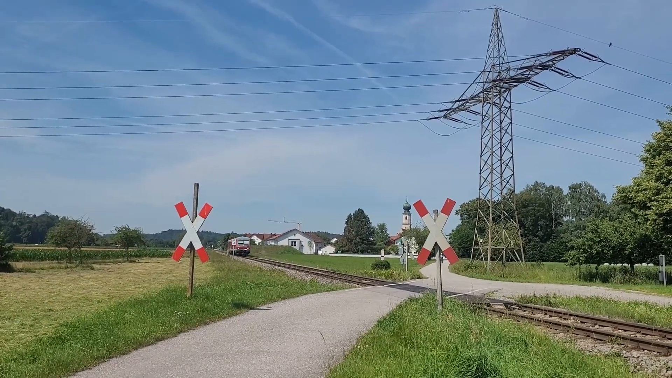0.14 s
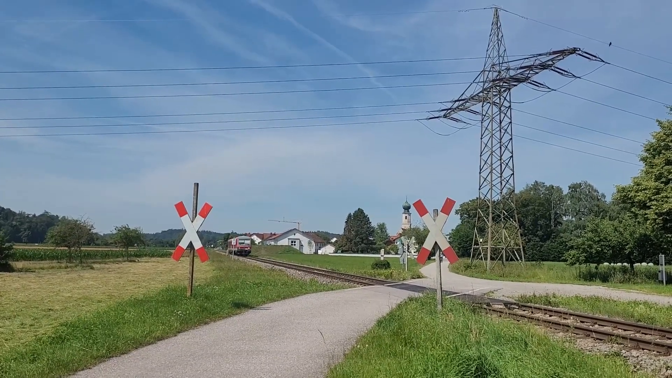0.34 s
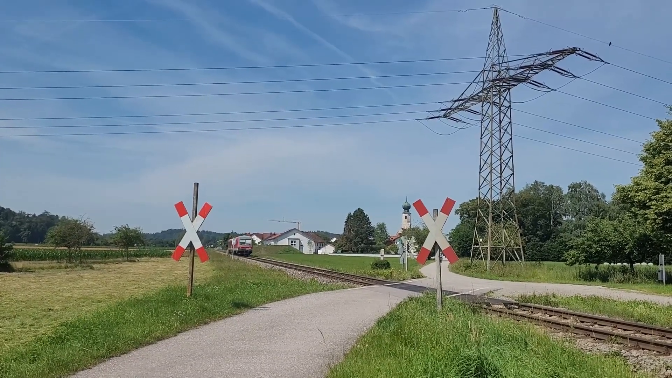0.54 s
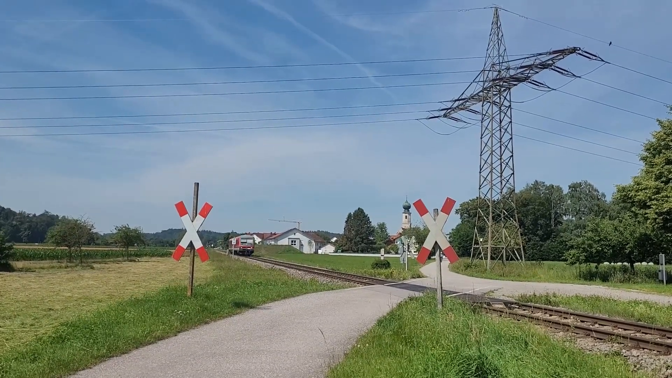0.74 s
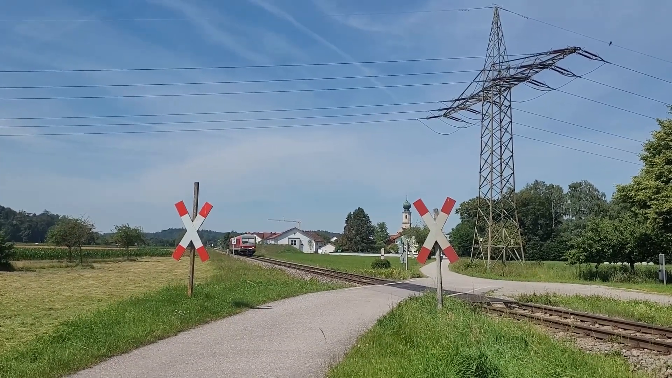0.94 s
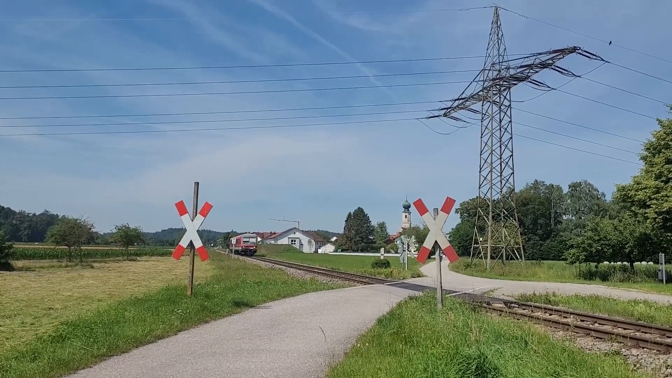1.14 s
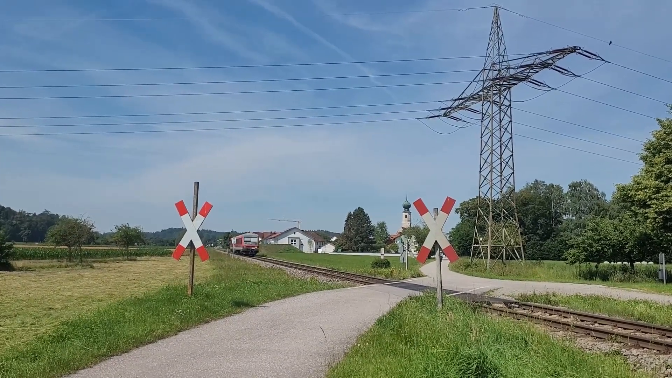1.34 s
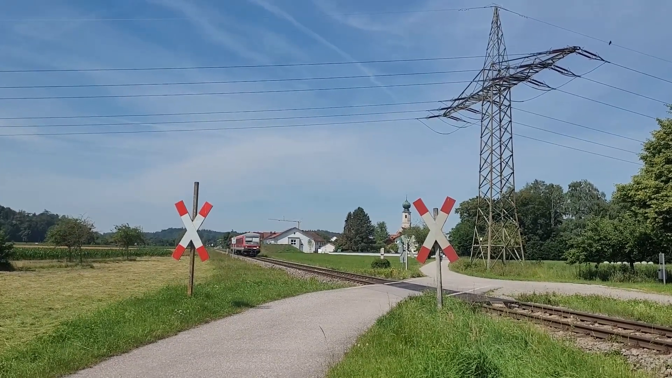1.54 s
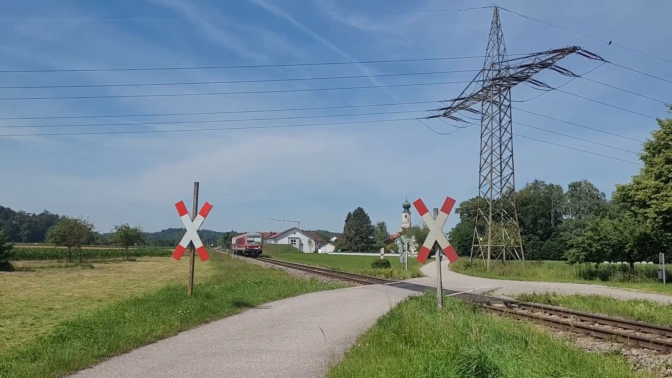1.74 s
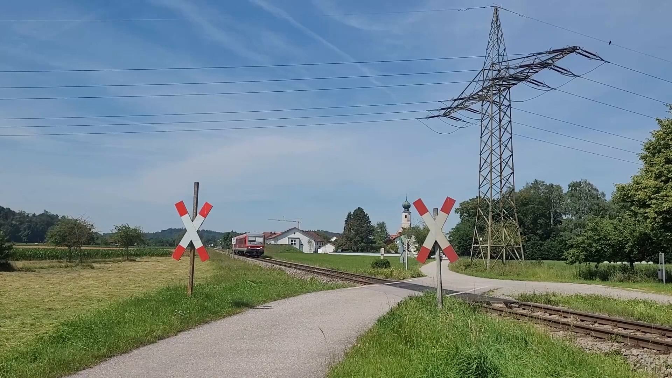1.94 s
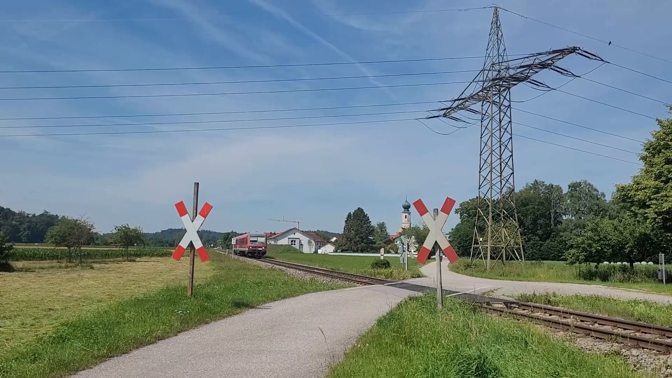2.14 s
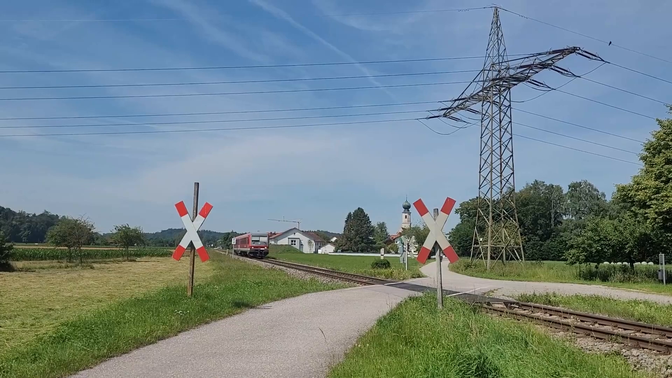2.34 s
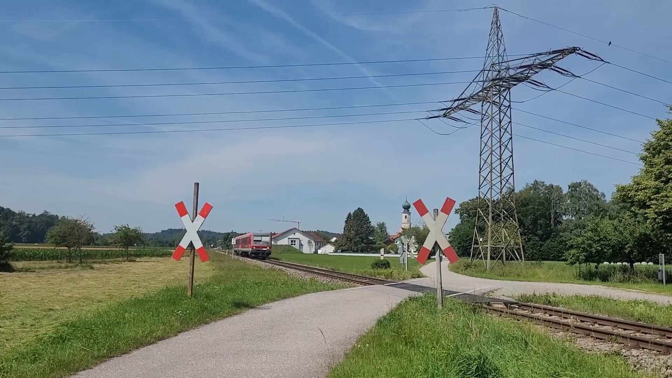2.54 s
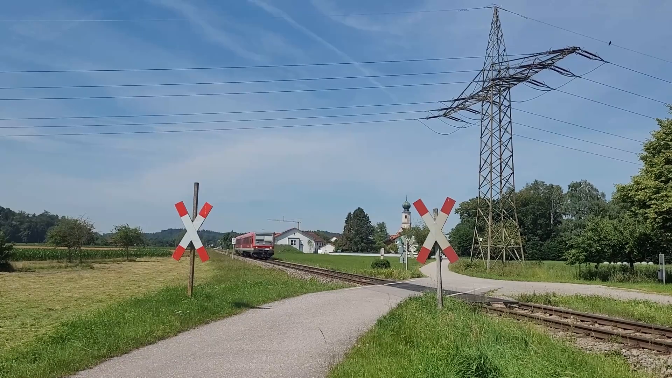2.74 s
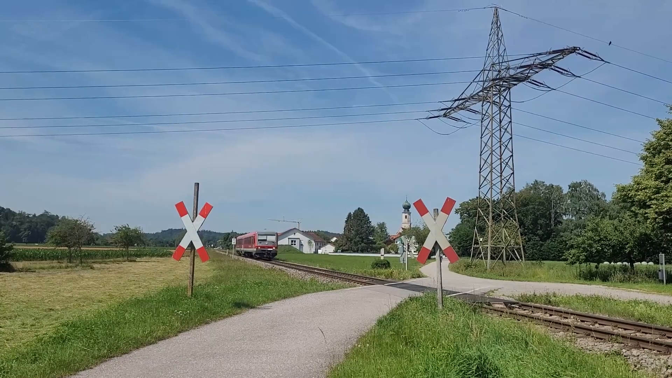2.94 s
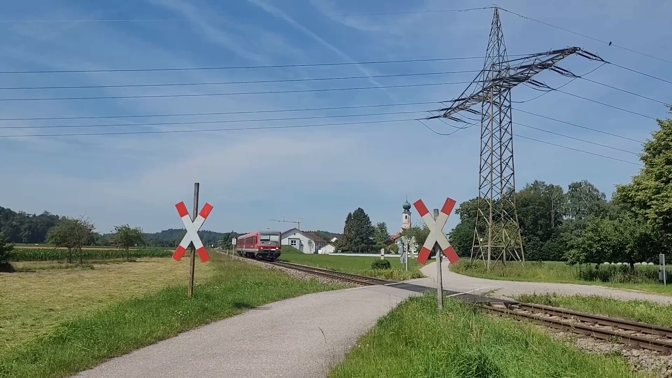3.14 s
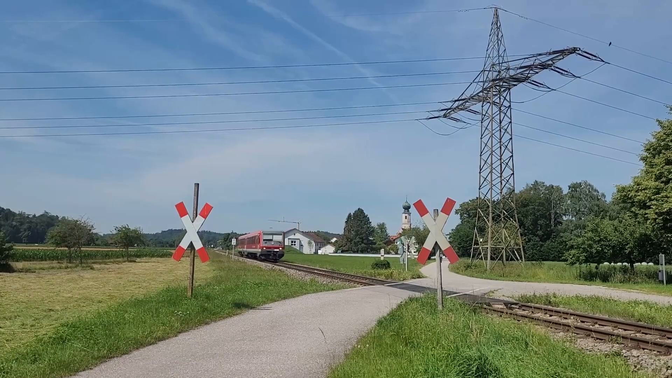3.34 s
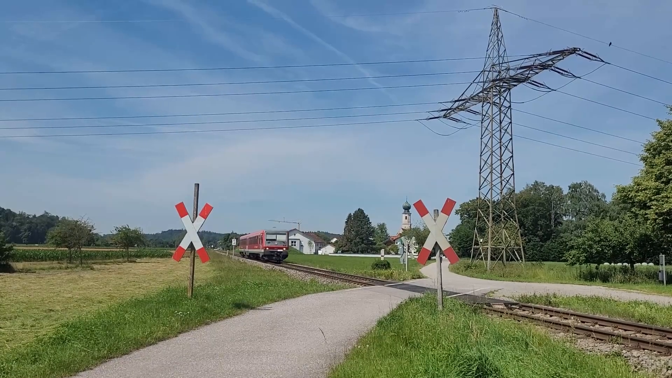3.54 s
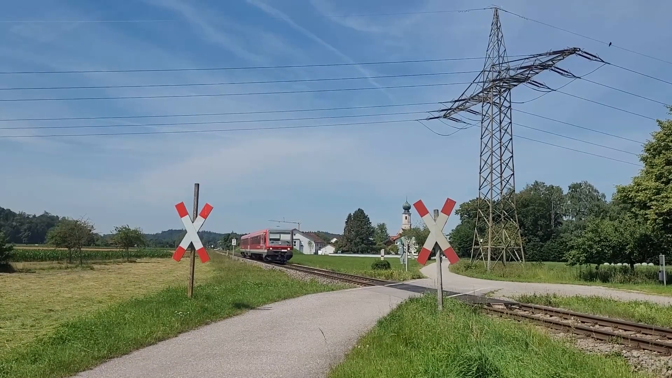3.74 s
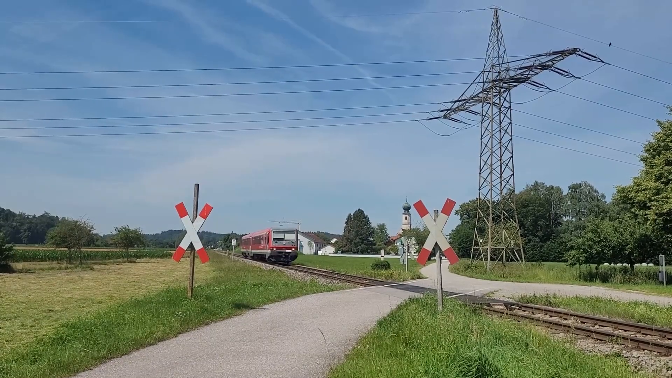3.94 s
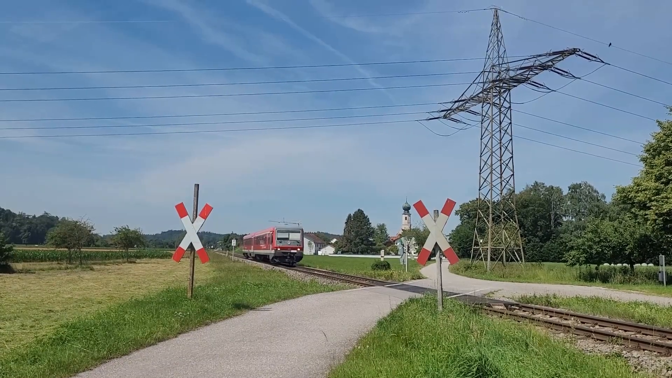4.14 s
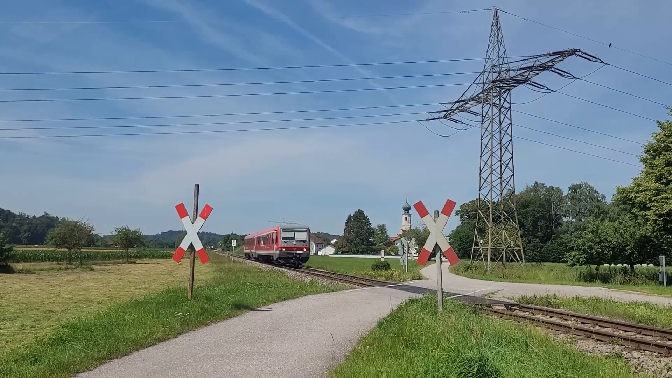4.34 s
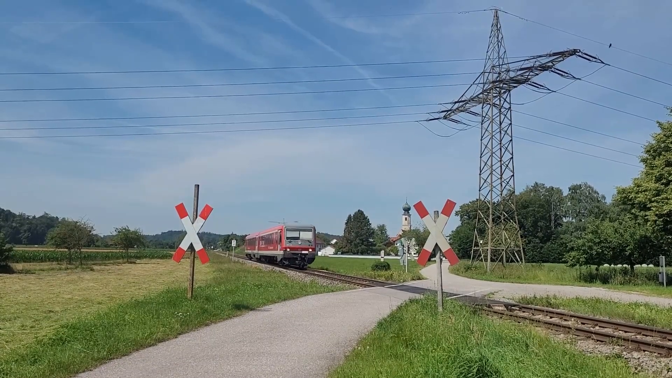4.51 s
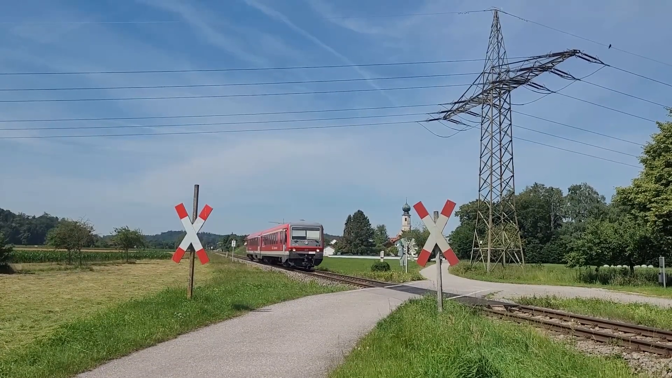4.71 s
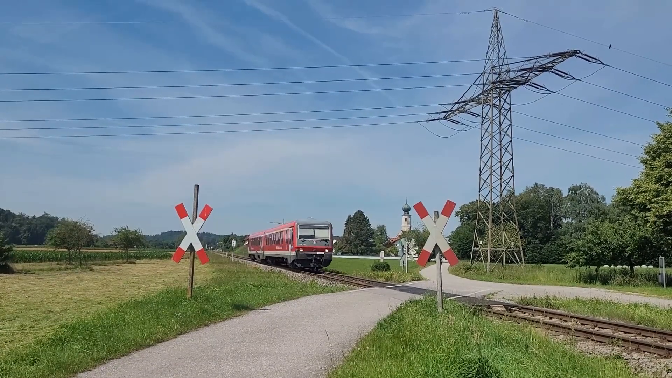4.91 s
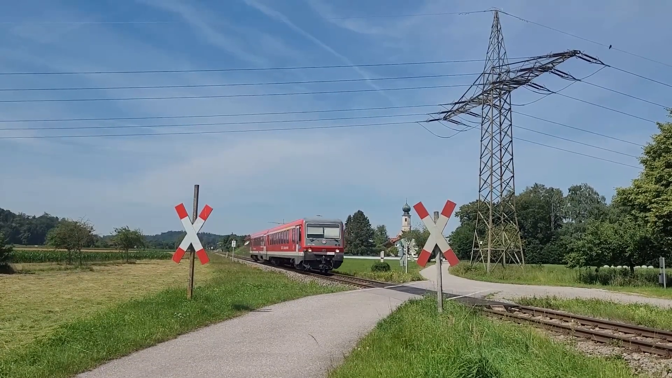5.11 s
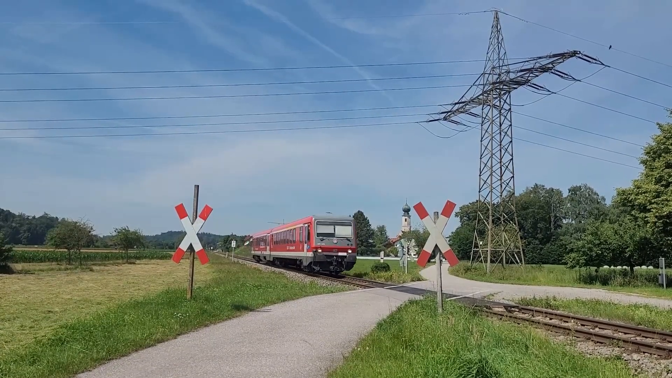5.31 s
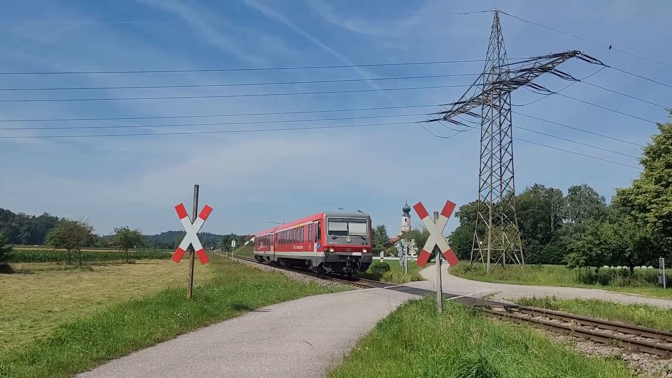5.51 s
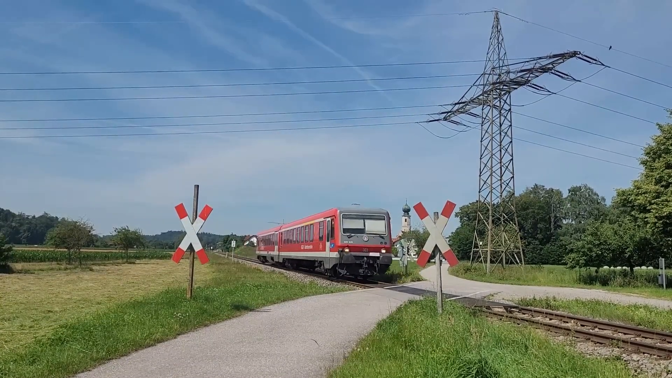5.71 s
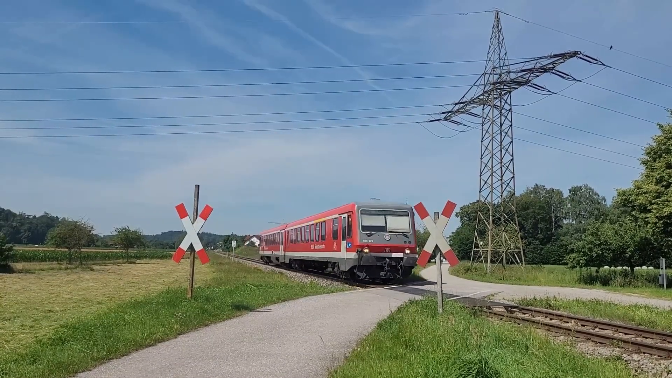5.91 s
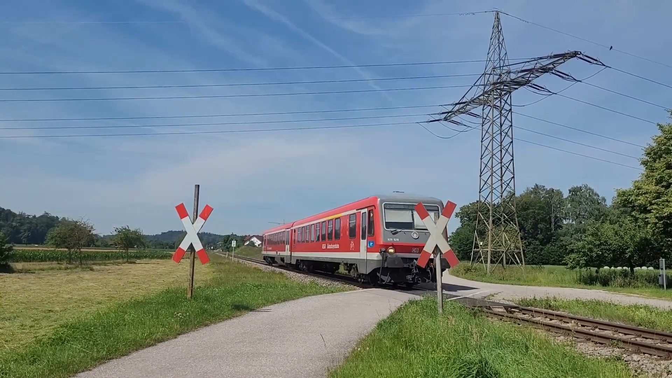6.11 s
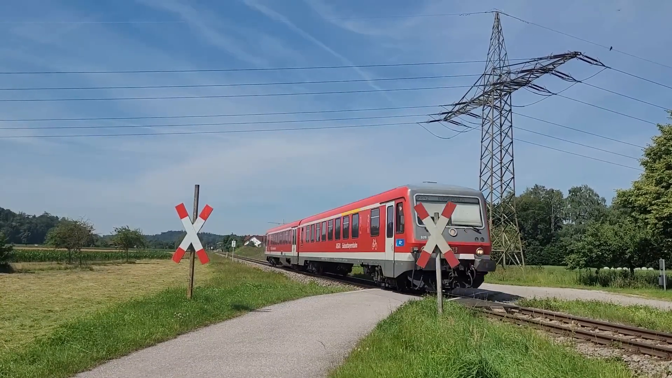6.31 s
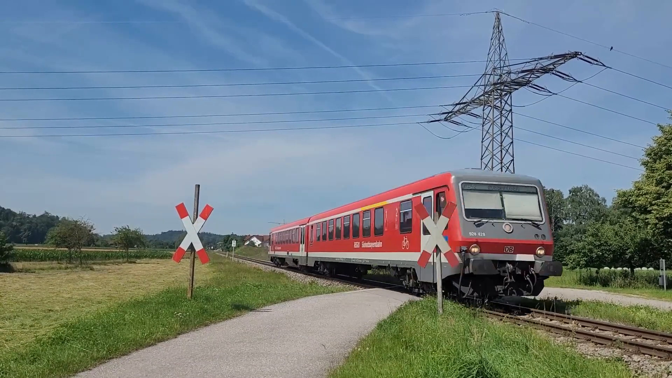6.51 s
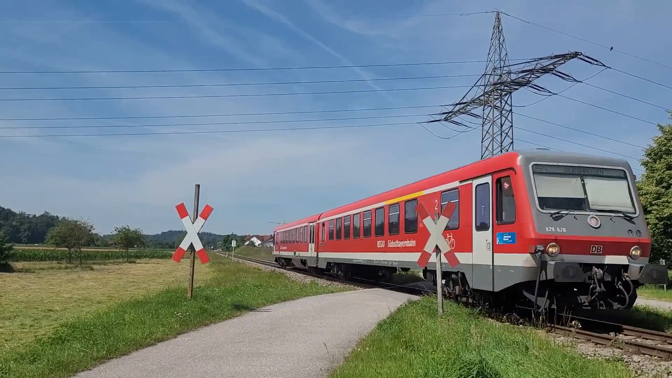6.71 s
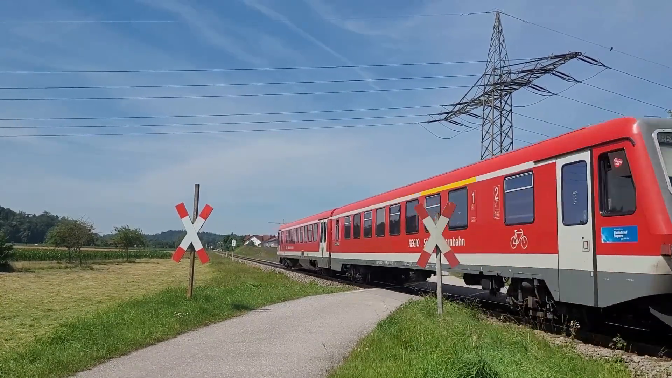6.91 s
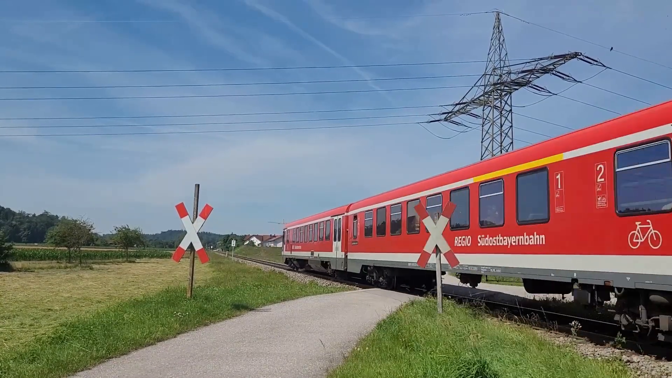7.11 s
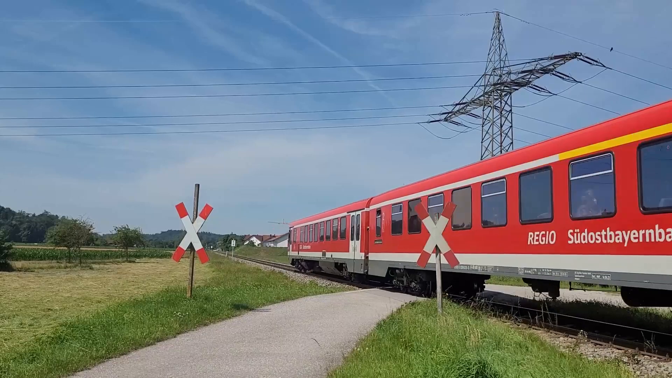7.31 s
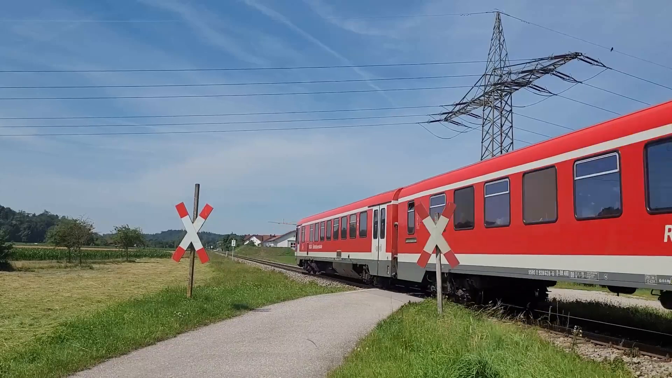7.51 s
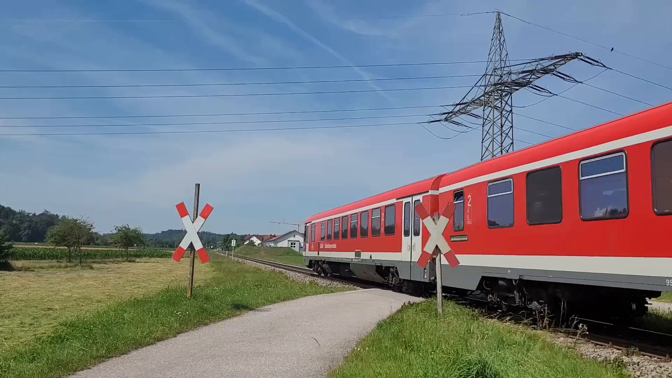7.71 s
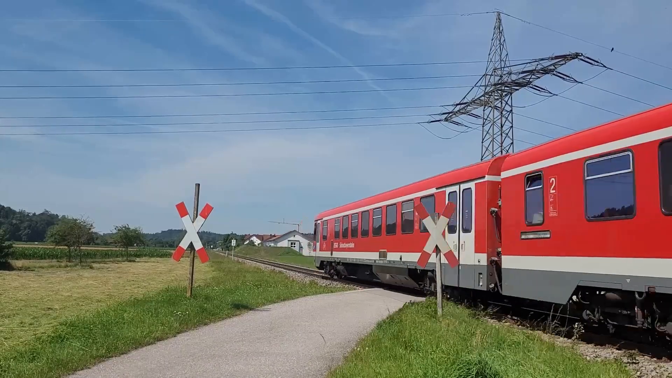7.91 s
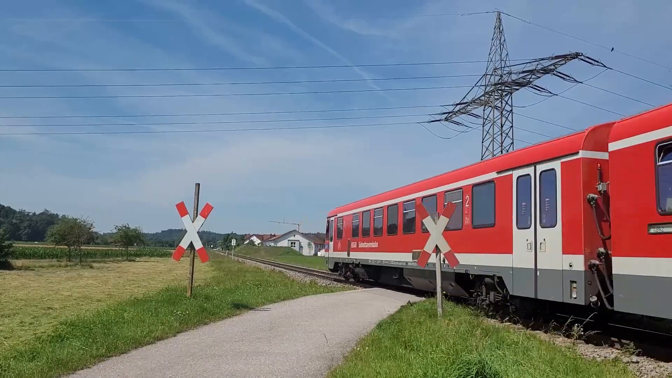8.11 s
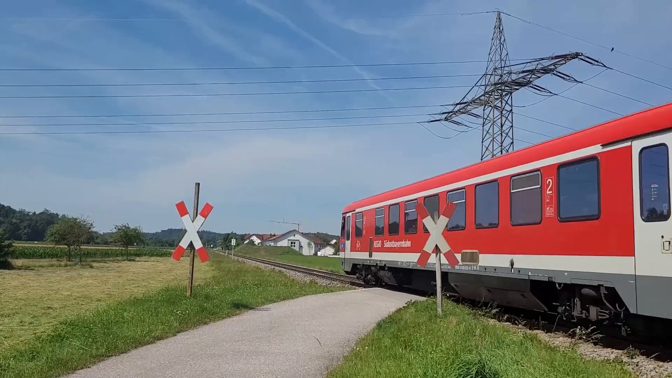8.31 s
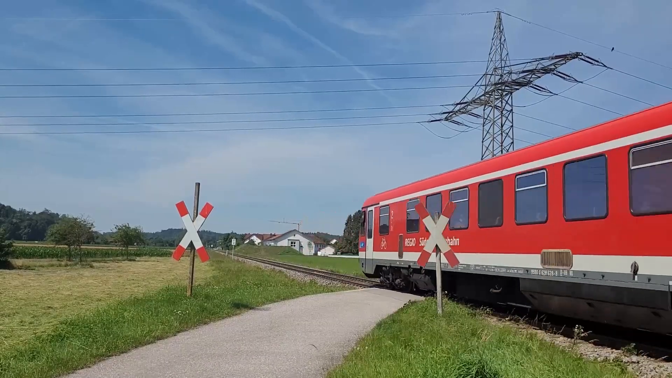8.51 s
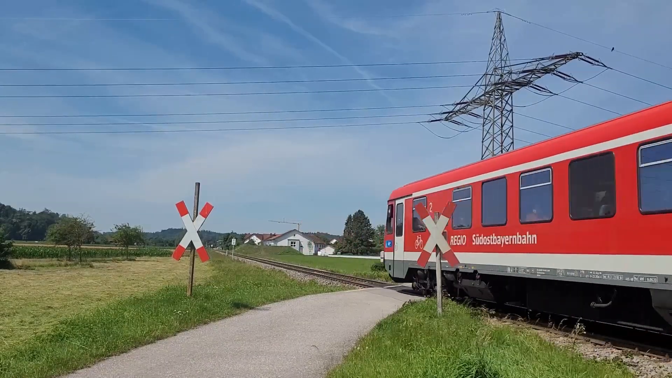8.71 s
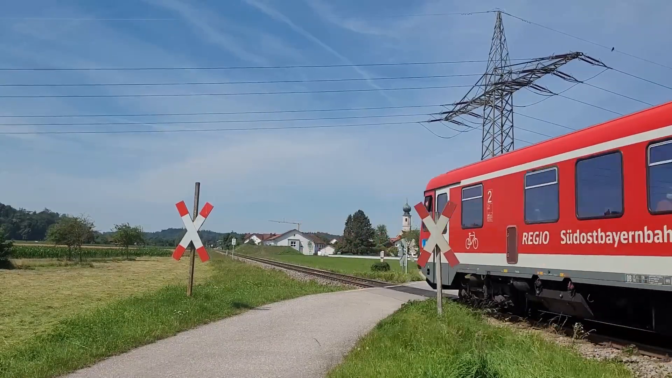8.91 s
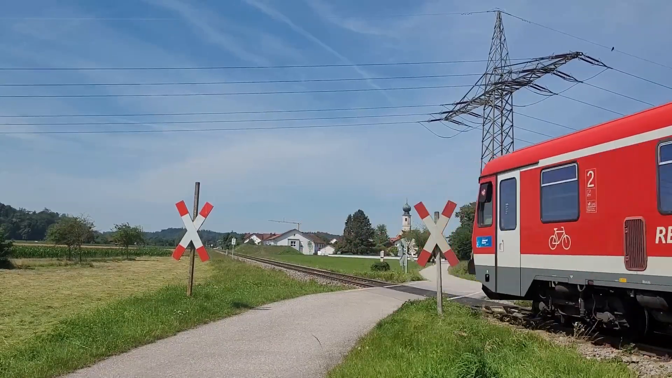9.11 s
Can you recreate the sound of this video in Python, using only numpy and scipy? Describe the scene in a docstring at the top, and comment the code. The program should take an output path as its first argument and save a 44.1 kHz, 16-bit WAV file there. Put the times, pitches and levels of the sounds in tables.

```python
"""A two-car diesel railcar comes across open fields and passes a few metres away at a level crossing.
Its engine rumbles, whines and drones; rough steel on steel makes the track roar and the rails and
wheels ring. The wheels thud over the crossing and three pairs of axles clash over a rail joint.
While it is still far off, birds call, something ticks drily by the track and a puff of air thumps
softly on the left, all over a bed of country hush."""
import sys
import numpy as np
from scipy import signal
from scipy.fft import rfft, irfft, next_fast_len
from scipy.io import wavfile
from scipy.ndimage import uniform_filter1d, map_coordinates

SR = 44100
rng = np.random.default_rng(int(sys.argv[2]) if len(sys.argv) > 2 else 0)


def wav_out(sig):
    """Save sig, one row per channel (or a flat mono array), as 16-bit PCM at SR to the path in sys.argv[1]."""
    wavfile.write(sys.argv[1], SR, np.round(np.clip(np.atleast_2d(sig).T, -1, 1) * 32767).astype(np.int16))


N = 403515
SPEED_M_PER_S, GAP_M, SOURCE_SIZE_M = 17, 5, 8.08  # train speed, passing distance, steel shaken per bogie

# each bogie draws level with the listener: t/s, rolling weight/dB, ring level/dB
BOGIES = [(7.15, 0, -46), (7.72, -1.5, -37.5), (8.42, -1.3, -37.5), (9.2, 5, -40)]
# noise colours of the train's layers, from far off to alongside: f/Hz, relative level/dB
ENGINE_FAR = [(18, -40), (30, -18), (45, -2.5), (68, 5.5), (100, -2.5), (125, -4.5), (152, -5.5),
              (190, -20), (260, -79)]
ENGINE_NEAR = [(30, -40), (41, -0.5), (64, -1), (88, 2), (130, 0.5), (175, -5), (200, -28), (260, -44)]
BODY_COLOUR = [(97, -14), (160, -5.5), (199, -5.5), (238, -1), (293, -3.5), (334, -9.5), (381, -6.5),
               (430, -14.5), (860, -75)]
TRACK_FAR = [(230, -26), (390, -13), (421, -14.5), (507, -2), (588, 2.5), (772, -1.5), (825, 2.5),
             (880, -9), (925, -7), (1070, 1.5), (1330, -20.5), (2150, -68)]
TRACK_HEAD_ON = [(230, -42), (390, -11), (423, -17.5), (567, -3.5), (834, -17), (905, -19), (1400, -23),
                 (2500, -75)]
TRACK_BY_CAB = [(300, -30), (420, -28), (580, 4), (720, 3.5), (850, -2), (1050, -4), (1300, -22),
                (1700, -59)]
TRACK_NEAR = [(230, -34), (390, -12), (437, -6.5), (610, -1), (910, -8.5), (1080, -13), (1400, -24.5),
              (2500, -65)]
WHEELS_FAR = [(720, -38), (1230, -22.5), (1510, -5.5), (1850, -16.5), (2010, -10.5), (2200, -3.5),
              (2320, -25), (2430, -12.5), (3070, -14.5), (3380, -22.5), (3710, -16), (4330, -20),
              (4810, -14.5), (6600, -29.5), (8580, -74)]
WHEELS_NEAR = [(720, -12.5), (1230, -5.5), (1770, -4.5), (2240, 1.5), (2520, -8), (2840, -6), (3270, -13.5),
               (4090, -16.5), (4610, -12), (6600, -27.5), (8580, -56)]
HISS_FAR = [(4500, -29), (6200, -13), (7200, -6.5), (8400, -1.5), (10000, -10), (11800, -6), (13000, 4),
            (15500, -4.5)]
HISS_NEAR = [(4500, -18), (6200, -10), (6700, -10.5), (8100, -3.5), (9400, -11), (15500, -11)]
# how each layer builds: level beside one bogie/dB, gain per halving of distance/dB, field loss/(dB/m)
RUMBLE_GROWTH = (-29, 4.9, 0.066)
BODY_GROWTH = (-34, 13, 0.0022)
TRACK_GROWTH = (-30, 7.92, 0.13)
WHEELS_GROWTH = (-38, 10.3, 0.11)
HISS_GROWTH = (-55.5, 6.2, 0.098)
# swells and dips riding on that build: centre t/s, length/s, gain/dB
RUMBLE_SWELLS = [(0, 0.78, -9), (1.186, 0.11, -8), (2.8, .6, -0.5), (3.746, 0.094, -9), (4.42, 0.28, -5),
                 (6.16, 0.18, 6.5), (6.752, 0.78, 0), (7.45, 0.36, -5)]
BODY_SWELLS = [(.52, 0.23, 8), (2.4, 1.7, 9), (6.4, 0.62, 3), (7.4, 0.51, -2.5), (8.65, 1.2, 2.5)]
TRACK_SWELLS = [(6.09, 0.28, -4)]
HISS_SWELLS = [(4, 8.4, 4.3), (6, 0.64, 3.4), (7.6, 0.21, 4.6), (9, 0.96, 8.7)]
# tones of the engine and drive: f/Hz, level before the fader/dB
WHINE_TONES = [(279, -77), (705, -65.5), (826, -66), (1044, -72)]
DRONE_TONES = [(62, -32.5), (123.8, -35.5), (376.8, -51), (613.7, -31.5)]
# their faders, whine from ahead and drone from alongside: t/s, whine gain/dB, drone gain/dB
TONE_FADERS = [(0, -31, -69), (2.6, 1.5, -30), (5.4, 7.5, -47), (6.4, 14.5, -6), (8.55, -18, -4.5),
               (8.67, -24, 3.5)]
# the loudest engine tone surges as the cars go by: t/s, level/dB
HUM_LEVEL = [(0, -82), (5.7, -55), (6.5, -38), (7.62, -37), (7.73, -24), (7.87, -40), (8.26, -25.5),
             (8.42, -36), (8.55, -18.5), (8.68, -20), (8.78, -32), (8.88, -19), (9.02, -31)]
# its pitch sinks: t/s, f/Hz
HUM_PITCH = [(6.9, 297), (7.8, 281.7)]
# resonances of the steel: f/Hz, width/Hz, relative level/dB
RAIL_MODES = [(1539, 180, 1.5), (2161, 220, 10), (3040, 90, -6), (4650, 130, -12), (4920, 160, -14.5)]
WHEEL_MODES = [(2263, 110, -1), (2843, 110, 4), (3710, 70, -5.5), (4630, 83, -7.5)]
# the rails sing ahead of the cab: t/s, level/dB
RAIL_LEVEL = [(3, -75), (5.4, -57), (6.12, -44), (6.3, -36.5), (6.56, -33), (6.85, -43.5), (7.3, -71)]
# wheels hit the crossing and jolt the car body: t/s, ring f/Hz, strength/dB
THUDS = [(5.694, 594, -24.5), (6.19, 543, -22), (6.485, 555, -17.5), (6.558, 578, -19), (6.617, 655, -14.5),
         (6.663, 668, -18.5), (6.727, 737, -16.5), (6.775, 900, -18), (6.815, 563, -20.5),
         (6.935, 142, -14.5), (7.039, 252, -16), (7.68, 558, -15.5), (7.924, 238, -11), (8.041, 258, -12),
         (9.094, 601, -8.5)]
# axles hit the rail joint: t/s, strength/dB
AXLE_HITS = [(7.097, -23.5), (7.21, -25), (7.952, -27), (8.06, -26.5), (8.385, -29.5), (8.495, -33.5)]
# dry ticks by the track: t/s, snap strength/dB, ring f/Hz
TICKS = [(2.034, -43, 2950), (2.073, -46.5, 2330), (2.1235, -47, 3070), (2.605, -43, 2740),
         (2.6429, -44, 2320), (2.6938, -48, 3060), (3.593, -44, 2610), (3.6306, -41.5, 2340),
         (3.681, -47, 3060), (3.7234, -47, 2540), (3.7865, -41.5, 2430), (3.8417, -45, 2690),
         (3.8564, -52, 2500), (3.911, -40, 2400), (3.9794, -48, 2400), (4.036, -38.5, 2400),
         (4.0921, -43, 2450), (4.159, -44, 2480), (4.2926, -43, 2300), (4.4914, -44, 2980),
         (4.69, -40, 2500), (4.7641, -40, 2520), (5.09, -41, 2380)]
# bird notes: t/s, length/s, start f/Hz, end f/Hz, level/dB
WHISTLES = [(0, 0.081, 2080, 1980, -56.5), (.17, 0.21, 1700, 1475, -68), (0.444, 0.19, 1970, 1935, -60),
            (.65, 0.083, 2250, 2170, -61.5), (0.727, 0.13, 2460, 2420, -63), (1.066, 0.1, 2100, 2010, -62),
            (1.318, 0.045, 2100, 1920, -58.5), (1.48, 0.05, 2300, 2150, -60), (1.62, .06, 2050, 2130, -61)]
TWITTERS = [(1.11, .05, 4400, 4950, -69), (1.645, .08, 5400, 4000, -68), (2.16, .06, 4800, 4100, -66),
            (2.735, .07, 4700, 4300, -68), (3.125, 0.07, 4800, 4350, -66.5), (4.26, .06, 3900, 3300, -63)]
# noise colours of the hits and the background bed: f/Hz, relative level/dB
THUD_COLOUR = [(70, -24), (290, 9), (620, 3), (1200, -4), (2200, -1.5), (9000, -72)]
CLASH_COLOUR = [(1350, -17), (2300, -3), (3680, -5.5), (5050, -5), (6820, -9.5), (8290, -6), (15100, -13.5),
                (16000, -4)]
TICK_COLOUR = [(1700, -27), (2450, 6.5), (3100, 3), (3600, -5), (5200, -2.5), (7000, -6.5), (8300, -1),
               (10000, -6.5), (11500, -2), (14000, -3)]
HUSH_COLOUR = [(30, -6), (150, -6), (460, 0.5), (750, -11), (1300, -14.5), (2000, -6.5), (3200, -17),
               (3800, -15), (6000, -30), (9000, -50)]
HIGH_HISS_COLOUR = [(11000, -28), (12200, -16), (13200, -7), (15500, -2)]
# stereo width of a source ahead and alongside: f/Hz, side minus mid/dB
WIDTH_AHEAD = [(60, -11), (200, -14), (700, -13), (1290, -4), (2200, -1.5), (4400, .5)]
WIDTH_BESIDE = [(60, -13.5), (200, -22.5), (380, -8), (700, -0.5), (1290, 5.5), (2380, -6.5), (4400, 0.7)]


def engine():
    """A throbbing rumble, a thin whine on the approach, a drone as the underfloor engine draws level."""
    rumble_db = approach(RUMBLE_GROWTH, RUMBLE_SWELLS)
    throb = unit(amp(3.6 * wobble(16)))
    rumble = amp(rumble_db) * throb * passing((4.8, ENGINE_FAR, 0), (7.2, ENGINE_NEAR, 1))
    whine_db, drone_db = curves(TONE_FADERS)
    whine = amp(whine_db) * shaft_tones(WHINE_TONES, drift=0.00231, flutter_db=-0.5, lag_ms=0.066)
    drone = amp(drone_db) * shaft_tones(DRONE_TONES, drift=0.00496, flutter_db=3.5, lag_ms=-0.005)
    return rumble + whine + drone + hum()


def shaft_tones(partials, drift, flutter_db, lag_ms):
    """Machine tones that share the shaft's drift in speed; each flutters on its own."""
    shaft_time = np.cumsum(1 + drift * wobble(5)) / SR
    stereo_time = shaft_time + np.array([[.5], [-.5]]) * lag_ms / 1000
    mix = np.zeros((2, N))
    for hz, db in partials:
        flutter = unit(amp(flutter_db * wobble(14)))
        mix += np.sqrt(2) * amp(db) * flutter * np.sin(2 * np.pi * hz * stereo_time + 1.04 * wobble(22))
    return mix


def hum(waver=0.017, throb_db=2.8):
    """One strong engine tone that wavers, throbs and sinks in pitch."""
    (db,), (hz,) = curves(HUM_LEVEL), curves(HUM_PITCH)
    tone = np.sin(2 * np.pi * np.cumsum(hz * (1 + waver * wobble(30))) / SR)
    return from_right(amp(db) * unit(amp(throb_db * wobble(45)) * tone), lag_ms=0.12)


def rolling(sleeper_hz=19):
    """Rough steel on steel shakes the car body, the track and the wheels; all thrum over the sleepers."""
    thrum = np.sin(2 * np.pi * sleeper_hz * clock() + 2.6 * wobble(4.7)) + wobble(16)
    body_db = approach(BODY_GROWTH, BODY_SWELLS) + 1.4 * thrum + wobble(19)
    body = amp(body_db) * rush(BODY_COLOUR, beside=0.61)
    track_db = approach(TRACK_GROWTH, TRACK_SWELLS) + 0.62 * thrum + wobble(70)
    track = amp(track_db) * passing((6.0, TRACK_FAR, 0), (6.45, TRACK_HEAD_ON, .6),
                                    (6.88, TRACK_BY_CAB, 1), (7.6, TRACK_NEAR, 1))
    wheels_db = approach(WHEELS_GROWTH) + 1.02 * thrum + 1.1 * wobble(90)
    wheels = amp(wheels_db) * passing((6.5, WHEELS_FAR, 0), (7.1, WHEELS_NEAR, 1))
    hiss_db = approach(HISS_GROWTH, HISS_SWELLS) + 0.37 * thrum + 1.2 * wobble(150)
    hiss = amp(hiss_db) * passing((5.6, HISS_FAR, 0), (7.2, HISS_NEAR, 1))
    return body + shimmer(track + hiss, depth_db=2.0) + shimmer(wheels, depth_db=2.4)


def approach(growth, swells=()):
    """A layer's level in dB: it builds as the bogies near, less what the fields absorb on the way."""
    near_db, halving_db, loss_db_per_m = growth
    t, closest = clock(), np.hypot(GAP_M, SOURCE_SIZE_M)
    power = sum((amp(db) * closest / np.hypot(closest, SPEED_M_PER_S * (t - s))) ** 2
                for s, db, _ in BOGIES)
    ahead_m = SPEED_M_PER_S * np.maximum(BOGIES[0][0] - t, 0)
    swell_db = sum(db * .5 ** ((2 * (t - s) / length) ** 2) for s, length, db in swells)
    return near_db + halving_db * np.log2(np.sqrt(power)) - loss_db_per_m * ahead_m + swell_db


def passing(*stages):
    """Noise that crossfades in colour and direction as the train nears; a stage is t/s, colour, beside."""
    times = [s for s, _, _ in stages]
    shares = [np.interp(clock(), times, row) for row in np.eye(len(stages))]
    return sum(np.sqrt(share) * rush(colour, beside) for share, (_, colour, beside) in zip(shares, stages))


def shimmer(x, depth_db, frame=1024):
    """Patches a few hundred Hz wide swell and fade as the contact wanders over the steel."""
    spectra = signal.stft(x, nperseg=frame)[2]
    patches = uniform_filter1d(rng.standard_normal(spectra.shape[1:]), size=4, axis=0)
    patches = uniform_filter1d(patches, size=10, axis=1)
    return signal.istft(spectra * amp(depth_db * unit(patches)), nperseg=frame)[1][:, :N]


def rail_song():
    """The rails sing ahead of the cab until the car body screens them."""
    level_db, = curves(RAIL_LEVEL)
    song = amp(level_db + 0.62 * wobble(30)) * ringing(RAIL_MODES)
    return np.array([song, song])


def wheel_ring(sound_m_per_s=343):
    """Each bogie rings in rough, shifting patches, louder as it nears, and drops in pitch going by."""
    t, steel, ring = clock(), ringing(WHEEL_MODES), np.zeros(N)
    for s, _, db in BOGIES:
        distance = np.hypot(GAP_M, SPEED_M_PER_S * (t - s))
        doppler = np.interp(t - distance / sound_m_per_s, t, np.roll(steel, rng.integers(N)))
        # the sound spreads with distance, and the wheel discs radiate sideways
        ring += amp(db) * (GAP_M / distance) ** 2 * doppler
    return shimmer(from_right(ring, lag_ms=0.45), depth_db=5.5)


def ringing(modes):
    """Steel modes kept ringing by rough contact; rms 1."""
    ring = np.zeros(N)
    for hz, width, db in modes:
        phase = 2 * np.pi * hz * clock()
        ring += amp(db) * (wobble(1.5 * width) * np.cos(phase) + wobble(1.5 * width) * np.sin(phase))
    return unit(ring)


def thuds(noise_db=-13):
    """Dull blows of the wheels: each rings briefly in the track or car body, with a burst of noise."""
    ring = from_right(knocks(THUDS, rise=0.0021, t60=0.075), lag_ms=0.15)
    burst = amp(noise_db) * strikes([(s, db) for s, _, db in THUDS], rise=0.0019, t60=0.11)
    return ring + burst * rush(THUD_COLOUR, beside=.6)


def rail_joint(rise=0.018, t60=0.4):
    """Each axle grinds onto the joint in a bright clash that dies away along the rail."""
    t, power = clock(), np.zeros(N)
    for s, db in AXLE_HITS:
        attack = np.exp(-(np.minimum(t - s, 0) / rise) ** 2)
        power += attack * amp(db - 60 * np.maximum(t - s, 0) / t60) ** 2
    return np.sqrt(power) * rush(CLASH_COLOUR, beside=0.68)


def ticks(wood_db=-50.5):
    """Short dry snaps in the verge, each with a woody ring and a faint rattle."""
    hits = [(s, db) for s, db, _ in TICKS]
    snap = strikes(hits, rise=0.007, t60=0.032)
    rattle = amp(-22.5 + 4.6 * wobble(200)) * strikes(hits, rise=0.0026, t60=0.43)
    wood = knocks([(s, hz, wood_db) for s, _, hz in TICKS], rise=0.00091, t60=0.032)
    return (snap + rattle) * rush(TICK_COLOUR) + wood


def birds(echo_db=-4, t60=0.31):
    """Far whistles and rough twitters, with a short reverb from the trees."""
    twitter = calls(TWITTERS, waver=.035, waver_rate=260) * unit(amp(3.5 * wobble(140)))
    song = calls(WHISTLES, waver=.012, waver_rate=160) * amp(1.6 * wobble(71)) + twitter
    t = np.arange(SR // 2) / SR
    trees = rng.standard_normal((2, len(t))) * amp(-60 * t / t60)
    echo = signal.fftconvolve(song[None], trees / np.linalg.norm(trees[0]), axes=1)[:, :N]
    return song + amp(echo_db) * echo


def calls(notes, waver, waver_rate):
    """Bird notes that quiver and slide onto their end pitch."""
    song, quiver = np.zeros(N), 1 + waver * wobble(waver_rate)
    for s, length, start_hz, end_hz, db in notes:
        progress, onset = np.linspace(0, 1, int(length * SR)), round(s * SR)
        span = slice(onset, onset + len(progress))
        pitch = (end_hz + (start_hz - end_hz) * (1 - progress) ** 2) * quiver[span]
        arch = np.sqrt(np.abs(np.sin(np.pi * progress)))
        song[span] += amp(db) * arch * np.sin(2 * np.pi * np.cumsum(pitch) / SR)
    return song


def puff(start=.472, hz=100, rise=0.00057, t60=0.065, db=-27):
    """One soft thump of air, mostly on the left."""
    t = np.maximum(clock() - start, 0)
    envelope = (1 - np.exp(-t / rise)) * amp(-60 * t / t60)
    return -amp([[db], [db - 17]]) * envelope * np.sin(2 * np.pi * hz * t)


def country_hush():
    """The bed: open-country air and a faint, very high steady hiss."""
    return amp(-65) * rush(HUSH_COLOUR, beside=1) + amp(-68.5) * rush(HIGH_HISS_COLOUR)


def rush(colour, beside=0, ahead_ms=-.05, beside_ms=0.37, direct=0.97):
    """Stereo noise with a mid of rms 1; from ahead (beside=0) to alongside (1), the right comes to lead."""
    size = next_fast_len(N + 8192)
    hz = np.fft.rfftfreq(size, 1 / SR)
    mid, diffuse = rfft(rng.standard_normal((2, size))) * amp(along(colour, hz))
    lag = np.interp(beside, [0, 1], [ahead_ms, beside_ms]) / 1000
    width_db = (1 - beside) * along(WIDTH_AHEAD, hz) + beside * along(WIDTH_BESIDE, hz)
    # a long source blurs the lag at short wavelengths
    lead = direct * np.sin(2 * np.pi * hz * lag) / (1 + (hz / 2300) ** 2)
    side = amp(width_db) * (1j * lead * mid + np.sqrt(1 - lead ** 2) * diffuse)
    mid, side = irfft([mid, side], size)[:, :N]
    return np.array([mid - side, mid + side]) / np.std(mid)


def strikes(hits, rise, t60):
    """The summed envelope of hits (t/s, strength/dB) that swell and die away."""
    t = np.arange(SR // 2) / SR
    blow = (1 - np.exp(-t / rise)) * amp(-60 * t / t60)
    envelope = np.zeros(N + len(t))
    for s, db in hits:
        envelope[round(s * SR):][:len(t)] += amp(db) * blow
    return envelope[:N]


def knocks(hits, rise, t60):
    """Hits (t/s, f/Hz, strength/dB) that each set one short resonance going."""
    t = clock()
    return sum(strikes([(s, db)], rise, t60) * np.sin(2 * np.pi * hz * (t - s)) for s, hz, db in hits)


def from_right(x, lag_ms):
    """Place a sound to the right by delaying the left channel."""
    return np.array([np.interp(clock() - lag_ms / 1000, clock(), x), x])


def wobble(rate):
    """A smooth random modulator with rate knots a second."""
    knots = rng.standard_normal(int(N * rate / SR) + 4)
    fine = np.arange(0, len(knots) - 1, 1 / 10)
    return np.interp(clock() * rate, fine, map_coordinates(knots, [fine]))


def curves(rows):
    """One automation curve for each column after the time."""
    times, *columns = np.transpose(rows)
    return [np.interp(clock(), times, column) for column in columns]


def along(points, hz):
    """An EQ curve (f/Hz, level/dB) read on a log frequency axis."""
    point_hz, db = np.transpose(points)
    return np.interp(np.log(hz + 1), np.log(point_hz + 1), db)


def amp(db):
    """Decibels to gain."""
    return 10 ** (np.asarray(db) / 20)


def unit(x):
    """Scale to rms 1."""
    return x / np.sqrt(np.mean(x ** 2) + 1e-20)


def clock():
    """The time of every sample."""
    return np.arange(N) / SR


def scene():
    """The train and the field around it."""
    train = engine() + rolling() + rail_song() + wheel_ring() + thuds() + rail_joint()
    return train + ticks() + birds() + puff() + country_hush()


def record(dry):
    """A brick-wall high cut on the whole mix."""
    size, top_hz = next_fast_len(N + 8192), 15850
    return irfft(rfft(dry, size) * (np.fft.rfftfreq(size, 1 / SR) < top_hz), size)[:, :N]


dry = scene()
out = record(dry)
wav_out(out)
```